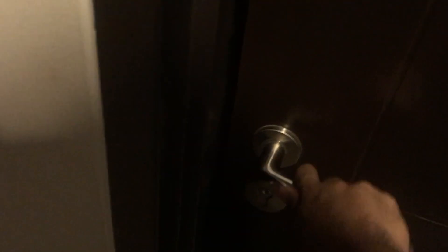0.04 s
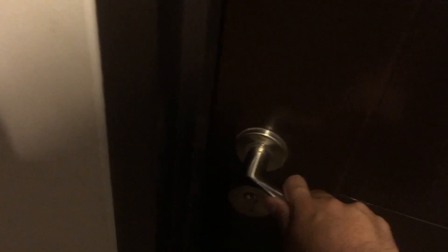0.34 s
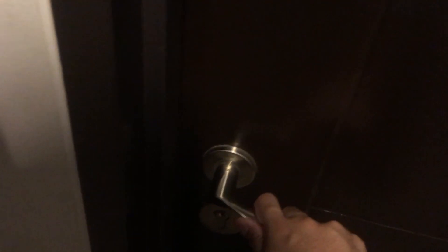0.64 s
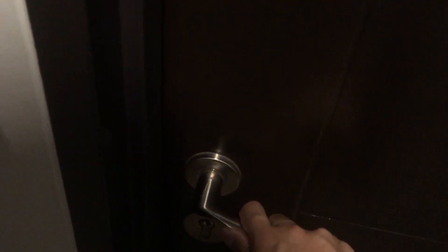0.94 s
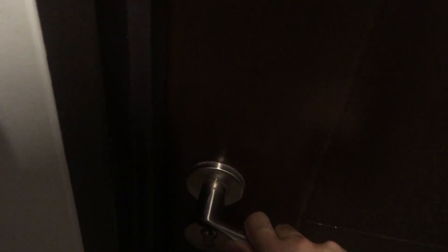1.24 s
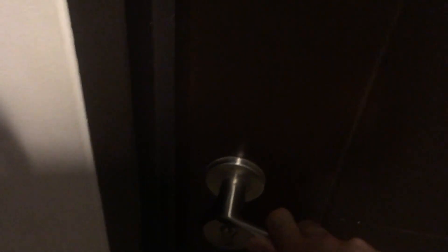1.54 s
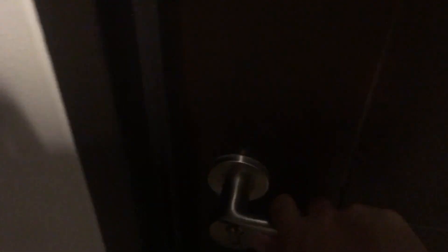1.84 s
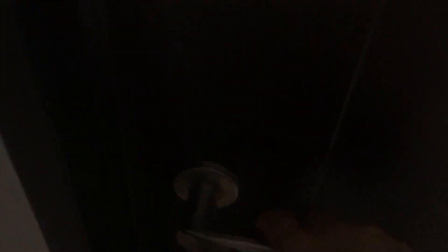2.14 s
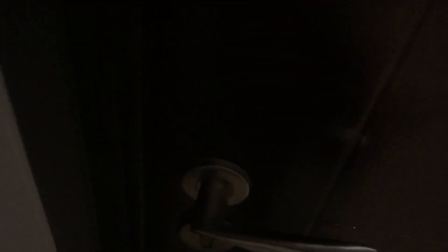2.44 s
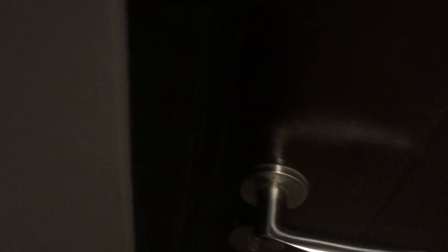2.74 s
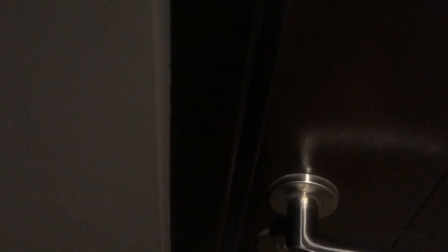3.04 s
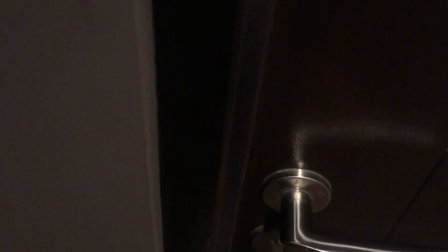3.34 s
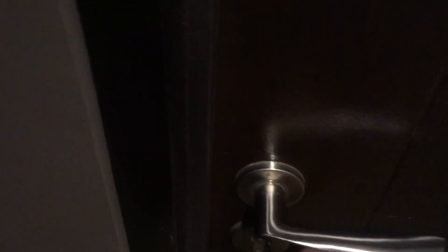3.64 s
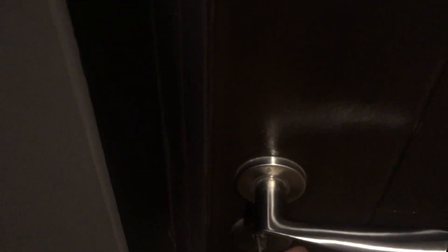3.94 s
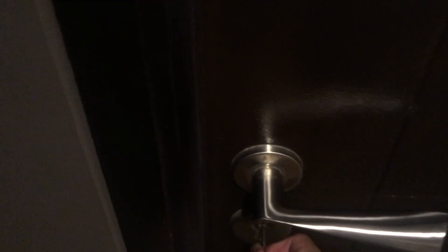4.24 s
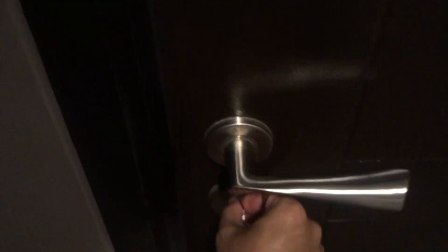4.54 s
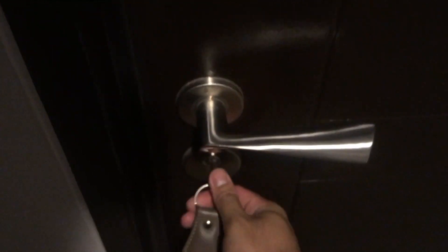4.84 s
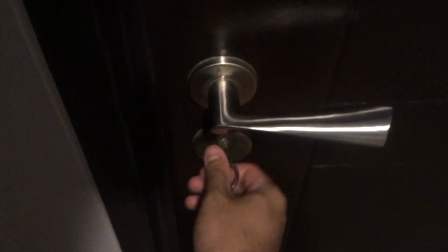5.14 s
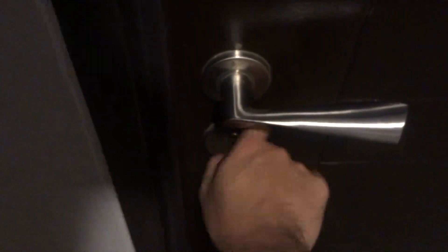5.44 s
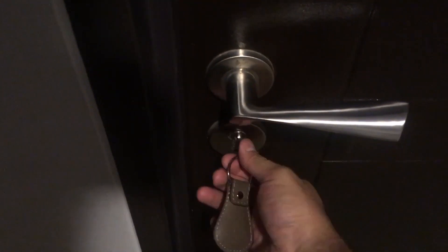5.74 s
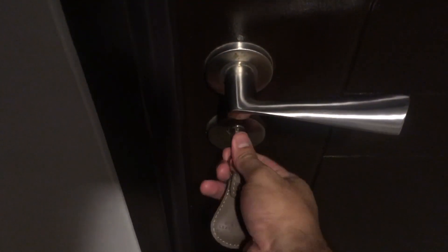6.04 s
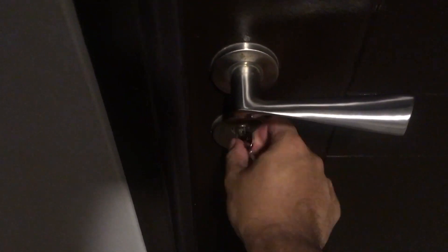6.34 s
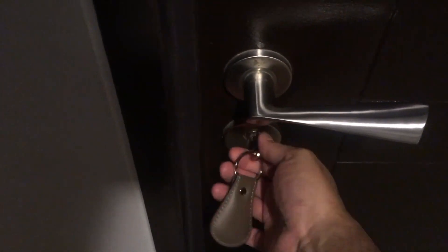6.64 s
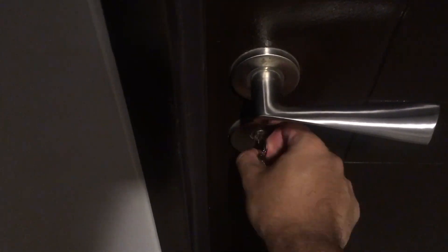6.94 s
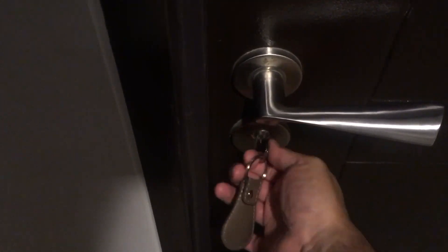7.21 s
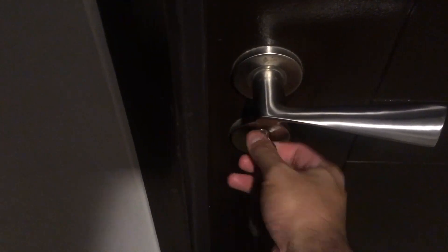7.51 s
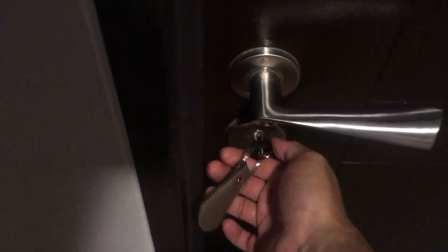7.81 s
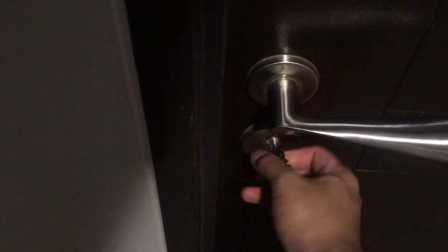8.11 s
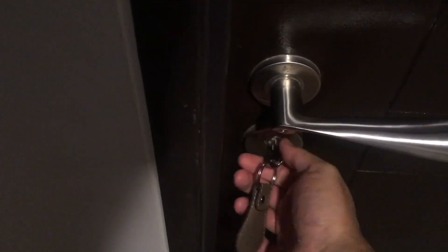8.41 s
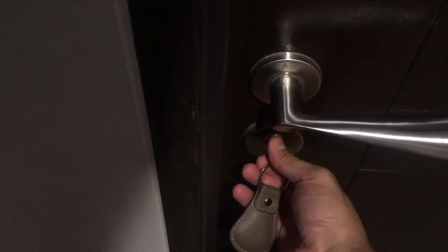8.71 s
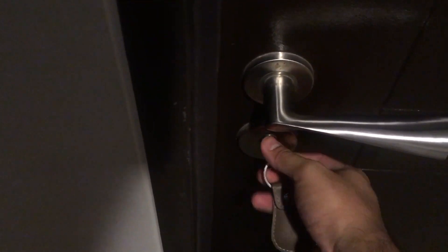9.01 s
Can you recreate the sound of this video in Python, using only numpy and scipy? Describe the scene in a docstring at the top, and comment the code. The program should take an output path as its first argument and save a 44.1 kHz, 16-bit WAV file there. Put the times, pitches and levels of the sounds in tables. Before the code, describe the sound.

A faint, low rush of building air runs throughout in a bare, slightly echoing hallway, with the microphone close to a door. At about 1.5 seconds the door is pushed shut, giving a series of dull thumps and latch rattles until about 2.6 seconds, while a hand slides on the lever handle with a soft hiss. Keys tinkle faintly between 2 and 3 seconds. Around 3.8 seconds a key scratches and clicks at the keyhole, then rides in over the pins with a quick gritty ripple at 4.5 seconds. The key turns three times, throwing the bolt with loud metal clacks at about 5.4, 6.3 and 7.6 seconds. Each jolts the door and leaves the lock ringing briefly. Thin, high key ring squeaks and sharp irregular clicks fill the gaps and continue until just after 9 seconds.

```python
"""A bare hallway, one microphone close to a door, the building's air rushing faintly behind.
First a hand slides on the lever handle and pushes the door shut: the leaf thumps, the latch rattles, and
metal tinkles faintly, like keys in a hand or pocket. Near 4 s a key scratches around the keyhole, then
rides in over the pins. From 5 s on it is turned three times; each turn squeaks the steel key ring and
throws the bolt with a loud clack that jolts the door and leaves the lock case ringing."""
import sys
import numpy as np
from scipy import signal
from scipy.fft import rfft, irfft, next_fast_len
from scipy.io import wavfile
from scipy.ndimage import uniform_filter1d

SR = 44100
rng = np.random.default_rng(int(sys.argv[2]) if len(sys.argv) > 2 else 0)


def materialize(psi):
    """Save the field psi as 16-bit PCM at rate SR to the path in sys.argv[1].

    A 1-D psi becomes a single channel; in a 2-D psi each row is a channel.
    """
    bounded = np.clip(np.atleast_2d(psi).T, -1, 1)
    quanta = np.round(bounded * 32767).astype(np.int16)
    wavfile.write(sys.argv[1], SR, quanta)


N = 404397
TIME = np.arange(N) / SR


def from_db(db):
    return 10 ** (np.asarray(db) / 20)


def rms_one(x):
    return x / np.sqrt(np.mean(x ** 2) + 1e-20)


def unit_energy(x):
    return x / np.sqrt(np.sum(x ** 2) + 1e-20)


def at_hz(points, hz):
    """Every column of a table, read on a log-frequency axis."""
    knots, *columns = np.transpose(points)
    return [np.interp(np.log(hz), np.log(knots), column) for column in columns]


def band(x, low_hz, high_hz, order=2):
    sos = signal.butter(order, [low_hz, min(high_hz, .45 * SR)], "band", fs=SR, output="sos")
    return signal.sosfilt(sos, x)


def decay(t60, size):
    return from_db(-60 * TIME[:size] / t60)


def resonate(x, hz, t60):
    """One mode with gain 1 at its peak."""
    r = np.exp(-np.log(1000) / (t60 * SR))
    feedback = [1, -2 * r * np.cos(2 * np.pi * hz / SR), r * r]
    return signal.lfilter(np.array([1, 0, -1]) * (1 - r * r) / 2, feedback, x + 1e-18)


def struck(modes, size):
    """The free ring of an object after one sharp blow."""
    return sum(from_db(db) * np.sin(2 * np.pi * hz * TIME[:size]) * decay(t60, size)
               for hz, db, t60 in modes)


def vary(modes, spread_db):
    """Each blow shares its energy differently among the modes."""
    return [(hz, db + rng.normal(0, spread_db), t60) for hz, db, t60 in modes]


def flicker(depth_db, size, smooth_samples):
    """A gain that wanders at random."""
    return from_db(depth_db * rms_one(uniform_filter1d(rng.standard_normal(size), smooth_samples)))


def add(track, t, sound):
    """Lay a sound into a track, starting at t seconds."""
    start = int(t * SR)
    track[start:start + len(sound)] += sound[:N - start]


def noise(colour):
    """Steady noise of a given spectrum, rms 1."""
    size = next_fast_len(N)
    level_db, = at_hz(colour, np.fft.rfftfreq(size, 1 / SR) + 1)
    return rms_one(irfft(rfft(rng.standard_normal(size)) * from_db(level_db), size)[:N])


def handling(level_db, count, from_s=4.8, to_s=8.9, spread_db=4):
    """Faint touches scattered over the time the fingers work the key: t/s, level/dB."""
    slot = (to_s - from_s) / count
    return [(from_s + slot * (k + when), level_db - spread_db * (2 * softness - 1))
            for k, (when, softness) in enumerate(rng.random((count, 2)))]


# spectra of the air in the hallway and of the distant rush: f/Hz, relative density/dB
AIR_COLOUR = [(15, -36), (25, -23), (53, -4.5), (92, -1.5), (123, -1.5), (149, -2.5), (223, -3), (263, -8),
              (354, -14.5), (503, -18.5), (1020, -22.5), (6050, -41), (7710, -47), (14800, -36),
              (16000, -54)]
RUSH_COLOUR = [(120, -25), (250, 12.5), (500, 7.5), (1100, 3.5), (2000, -6), (4000, -22), (8000, -25.5)]
# the rush as it reaches the microphone, with the door's swish near 0.76 s: t/s, level/dB
RUSH_LEVELS = [(0, -52), (.5, -71), (.72, -62), (.76, -51), (1.5, -49.5), (3.3, -49), (4.2, -47.5),
               (7, -45.5), (9.17, -47)]


def building_air(air_db=-42.5):
    """Room tone: steady low air all around, and a rush that dips early on, then swells near 0.76 s as the
    swinging door stirs the air."""
    rush_gain = from_db(np.interp(TIME, *np.transpose(RUSH_LEVELS)))
    return from_db(air_db) * noise(AIR_COLOUR) + rush_gain * noise(RUSH_COLOUR)


# the hallway from beside the door: f/Hz, early level/dB, early t60/s, tail level/dB, tail t60/s
HALL_RESPONSE = [(158, 1.5, 0.35, -12, 1.1), (500, 0, 0.28, -11.5, 0.88), (1230, -8, 0.27, -10.5, 1.04),
                 (2820, -13.5, 0.24, -16.5, 1.45), (6100, -11.5, 0.32, -19, 1.26),
                 (9670, -12.5, 0.2, -21.5, 0.89), (14300, -14, 0.26, -25, 0.85)]


def hallway(x, first_echo_s=0.00068):
    """Near walls answer quickly; further down the hall each band builds up and fades as a wash."""
    size, edges_hz = int(.5 * SR), np.geomspace(100, 17000, 17)
    echo, wash = np.zeros(size), np.zeros(N)
    onset = np.clip(TIME[:size] / first_echo_s - .5, 0, 1)
    white = rng.standard_normal((2, N))   # neighbouring bands get unrelated noise
    for k, (low, high) in enumerate(zip(edges_hz, edges_hz[1:])):
        early_db, early_t60, tail_db, tail_t60 = at_hz(HALL_RESPONSE, np.sqrt(low * high))
        walls = band(rng.standard_normal(size), low, high, order=3) * decay(early_t60, size) * onset
        echo += from_db(early_db) * np.sqrt(2 * (high - low) / SR) * unit_energy(walls)
        kept = np.exp(-2 * np.log(1000) / (tail_t60 * SR))
        energy = signal.lfilter([1 - kept], [1, -kept], band(x, low, high, order=3) ** 2)
        wash += from_db(tail_db) * np.sqrt(energy) * rms_one(band(white[k % 2], low, high, order=3))
    return x + signal.fftconvolve(x, echo)[:N] + wash


# sleeve and hand at the handle: peak t/s, relative level/dB, rise/(dB/s), fall/(dB/s)
RUBS = [(1.8, -55, 84, 50), (2.15, -60, 23, 50), (2.55, -64, 19, 51), (3.2, -69, 3, 50)]
# their hiss: f/Hz, relative density/dB
RUB_COLOUR = [(800, -32), (1500, 12), (3000, 5), (6000, -2), (10000, 1.5), (15000, -0.5)]


def hand_rub(gain_db=9):
    """Sliding cloth and skin make a smooth hiss that swells and fades."""
    swells = [from_db(db - np.maximum(rise * (t - TIME), fall * (TIME - t)))
              for t, db, rise, fall in RUBS]
    return from_db(gain_db) * np.max(swells, axis=0) * noise(RUB_COLOUR)


# the key's tip around the keyhole, then its blade in the keyway: t/s, length/s, level/dB
SCRAPES = [(3.8, .03, -45.5), (3.9, 0.026, -45.5), (4.286, 0.023, -45), (4.38, .02, -45.5),
           (4.479, 0.074, -37.5), (4.882, .015, -53), (5.172, .03, -47.5), (5.727, .07, -51),
           (6.868, 0.074, -51.5)]
# their grit: f/Hz, relative density/dB
SCRAPE_COLOUR = [(300, -6), (650, -19), (1050, 19.5), (2000, 5), (3000, 3), (4500, -12), (6500, -5),
                 (10000, -11), (14000, -21)]


def key_scrape(attack_s=0.0089, release_s=0.015, rumble_db=0.5, rumble_lag_s=.02):
    """Each gritty stroke of the key builds up, holds and lets go; the door panel rumbles just after."""
    force = np.zeros(N)
    for t, length, db in SCRAPES:
        ramps = np.minimum((TIME - t) / attack_s, (t + length - TIME) / release_s)
        force += from_db(db) * np.exp(np.clip(ramps, -20, 0))
    burrs = flicker(-5, N, smooth_samples=130)
    panel = rms_one(band(rng.standard_normal(N), 195, 327))
    rumble = np.interp(TIME - rumble_lag_s, TIME, force) * panel
    return force * rms_one(burrs * noise(SCRAPE_COLOUR)) + from_db(rumble_db) * rumble


# faint tinkles near the microphone: t/s, level/dB
TINKLES = [(2.25, -48), (2.43, -44), (2.56, -48), (2.625, -56), (2.865, -54.5), (3.145, -49)]
# the small metal that tinkles: f/Hz, relative level/dB, t60/s
TINKLE_MODES = [(6300, -2, 0.058), (7760, -4, 0.066), (12750, 6, .06)]


def key_tinkles():
    """Faint, high metal tinkles, like keys jingling in a hand or pocket."""
    out = np.zeros(N)
    for t, db in TINKLES:
        add(out, t, from_db(db) * struck(vary(TINKLE_MODES, spread_db=3), SR // 5))
    return out


# loose parts in the door's metalwork: t/s, f/Hz, peak level/dB
CLINKS = [(1.904, 2340, -34), (3.771, 1820, -26.5), (3.955, 915, -23), (6.171, 560, -31),
          (6.704, 850, -27.5), (8.062, 1440, -23.5), (8.634, 888, -23.5), (9.096, 2870, -22.5)]


def loose_parts(t60=0.043):
    """A contact leaves one loose part ringing on a single note."""
    out = np.zeros(N)
    for t, hz, db in CLINKS:
        add(out, t, struck([(hz, db, t60)], SR // 5))
    return out


# steel key and ring: f/Hz, struck level/dB, rubbed level/dB, t60/s
RING_MODES = [(7660, -23, -27, 0.09), (8260, -14, -31, 0.11), (9420, 7, -7, 0.0067),
              (10900, -9, -26, 0.025), (11950, -12, 15.5, 0.0325), (13000, -14.5, -9, 0.047),
              (13800, 1, 15, 0.017), (14440, -2, 13, 0.018), (12500, -12, -5, .015),
              (14000, -16, -10, 0.017)]
# the ring sticks and slips in the bow of the key: t/s, length/s, level/dB
SLIPS = [(5.179, 0.014, -33), (5.199, .053, -30.5), (5.254, .013, -23.5), (5.267, 0.015, -28),
         (5.316, 0.011, -37), (6.216, .014, -42), (6.365, .034, -42), (6.434, .017, -38),
         (6.611, 0.012, -41), (6.762, 0.0037, -29), (7.013, 0.0065, -35.5), (7.282, 0.0089, -42),
         (7.361, 0.0055, -39), (7.38, .017, -41), (7.608, 0.025, -34), (7.68, .02, -43),
         (8.173, 0.016, -31), (8.247, 0.025, -40), (8.555, 0.0092, -35.5), (8.611, .012, -26.5),
         (9.121, .038, -44)]
# the ring swings free and is struck: t/s, level/dB
PINGS = [(4.092, -25.5), (4.288, -30.5), (8.048, -48)]


def key_ring(slips_per_s=2500, grit_db=-12, faint_slip_s=0.013, held_t60=0.017, ping_t60=.07):
    """Rapid uneven slips make the ring squeak, damped by the fingers; a free blow lets it ping."""
    out, size = np.zeros(N), SR // 4
    age = TIME[:size]
    faint = [(t, faint_slip_s, db) for t, db in handling(level_db=-50, count=12)]
    for t, length, db in SLIPS + faint:
        pressure = np.clip(np.minimum(age, length - age) / 0.0011, 0, 1)
        friction = rng.standard_normal(size) * pressure
        slipping = rng.random(size) < slips_per_s / SR
        friction *= slipping + from_db(grit_db)
        seat = rng.normal(1, 0.0076)   # the ring seats a little differently each time
        squeak = np.zeros(size)
        for hz, _, rubbed_db, t60 in RING_MODES:
            # the contact point wanders and favours one mode after another
            drive = friction * flicker(2.5, size, smooth_samples=400)
            seated_hz = hz * rng.normal(1, 0.01) * seat
            squeak += from_db(rubbed_db) * resonate(drive, seated_hz, min(t60, held_t60))
        to_rms = np.sqrt(length * SR)
        squeak = np.tanh(unit_energy(squeak) * to_rms / 2)   # friction limits its own swing
        add(out, t, from_db(db) * to_rms * unit_energy(band(squeak, 9400, 14700, order=8)))
    free_modes = [(hz, struck_db, min(t60, ping_t60)) for hz, struck_db, _, t60 in RING_MODES]
    for t, db in PINGS:
        ping = struck(vary(free_modes, spread_db=2.4), size)
        add(out, t, from_db(db) * band(ping, 7800, 13500))
    return out


# blows that shake the whole door: t/s, level/dB, contact time/s
THUMPS = [(1.456, -19, .011), (1.635, -19, 0.012), (2.202, -20, 0.0022), (2.33, -24.5, 0.0026),
          (2.424, -22, 0.007), (2.552, -27, 0.0051), (2.769, -37.5, 0.0046), (4.421, -32.5, 0.00092),
          (4.544, -32.5, 0.0011), (5.438, -37.5, .001)]
# the door leaf: f/Hz, relative level/dB, t60/s
LEAF_MODES = [(52, -16, .16), (73.24, 2, 0.75), (87.3, 7, 0.16), (127.3, 3.5, 0.1), (163, -2, 0.19),
              (220.7, -6, 0.31), (265, -3, 0.14)]


def door_leaf(jolts, gain_db=-3):
    """Soft blows and sharp jolts swing the leaf's low modes."""
    pushes = np.zeros(N)
    for t, db, contact_s in THUMPS + jolts:
        push = np.hanning(max(int(contact_s * SR), 8))
        add(pushes, t, from_db(db) * push / push.sum())
    swing = signal.fftconvolve(pushes, struck(LEAF_MODES, SR))[:N]
    return from_db(gain_db) * band(swing, 55, 350)   # the leaf radiates poorly in the deepest bass


def door_panel(contacts, gain_db=-6, limit_db=-30, t60=0.16):
    """The low band of each metal contact shakes the stiff panel, up to a limit."""
    out, size = np.zeros(N), SR // 4
    for t, low_db, *_ in contacts:
        shake = band(rng.standard_normal(size) * decay(t60, size), 137, 324, order=3)
        add(out, t, from_db(min(low_db, limit_db) + gain_db) * np.sqrt(0.013 * SR) * unit_energy(shake))
    return out


# share of a contact's brightness that reaches each band: low, middle, high, top
BRIGHTNESS_SHARE = [0.029, 0.026, 0.026, 1]


def contact(t, db, colour, brightness_db=0):
    """One touch of metal on metal: t/s, then its level in four bands, low/dB to top/dB."""
    return (t, *(db + np.array(colour) + brightness_db * np.array(BRIGHTNESS_SHARE)))


# knocks at the door's edge and handle: t/s, level/dB, brightness/dB
LATCH_KNOCKS = [(0.08, -48.5, -10), (0.138, -45, -13), (1.451, -42, 8.5), (1.6484, -46, 6),
                (1.681, -40.5, -33), (1.902, -33.5, -5), (2.1925, -27.5, -26), (2.1993, -30.5, -4),
                (2.2434, -41, -15), (2.3247, -28.5, -20), (2.419, -32, -18), (2.483, -39.5, -29),
                (2.5608, -56, 14), (3.361, -53, 12)]
# their colour: low/dB, middle/dB, high/dB, top/dB
KNOCK_COLOUR = [1, 0.47, -4.2, -0.62]


def latch_knocks():
    """Latch and handle knock as the door closes."""
    return [contact(t, db, KNOCK_COLOUR, brightness) for t, db, brightness in LATCH_KNOCKS]


# ticks at the keyhole: t/s, level/dB, transfer to the lock body/dB
KEY_TICKS = [(4.244, -42, -9), (4.2879, -33, -22), (4.676, -43, -14), (5.053, -28, -13),
             (5.0702, -37.5, -6), (5.7428, -31.5, -12), (5.792, -39, -7), (6.2266, -37, -20),
             (6.508, -43.5, -4.5), (6.702, -32, -17), (6.767, -24, -15), (7.2325, -43, -7),
             (7.2543, -43, -7), (7.2845, -31, -15), (7.2921, -30.5, -9.5), (7.9276, -38, -7),
             (7.938, -29, -14), (7.9916, -36, -9), (8.0474, -26, -14.5), (8.328, -46.5, -4.5),
             (8.455, -42.5, -5), (8.512, -35.5, -8), (8.5663, -39.5, -3.5), (9.15, -33.5, -9)]
# their colour: low/dB, middle/dB, high/dB, top/dB
TICK_COLOUR = [0, 0, -1, 0]
# 1 where the lock body carries the band: low, middle, high, top
BODY_BANDS = [1, 1, 1, 0]


def key_ticks(enter_s=4.4456, home_s=4.534, pin_db=-32.5, pin_body_db=-13.5, faint_body_db=-5):
    """The key's edge ticks against the keyhole, and its blade speeds up as it rides over eight pins."""
    pins = [(enter_s + (home_s - enter_s) * depth ** .7, pin_db, pin_body_db)
            for depth in np.linspace(0, 1, 8)]
    faint = [(t, db, faint_body_db) for t, db in handling(level_db=-50, count=12)]
    return [contact(t, db, TICK_COLOUR + body_db * np.array(BODY_BANDS))
            for t, db, body_db in KEY_TICKS + pins + faint]


# clicks from inside the lock: t/s, level/dB, brightness/dB
LOCK_CLICKS = [(3.771, -43.5, 0), (3.951, -29, -4), (3.9666, -32, -7), (4.4185, -28.5, -11),
               (4.537, -27.5, -10), (4.542, -34, 1), (4.553, -38, 2), (4.964, -46, -7), (5.08, -34.5, -3),
               (5.8757, -38.5, -4), (5.9096, -42.5, -9), (6.0164, -36.5, -15), (6.1698, -35, -14),
               (6.218, -40.5, -8), (6.62, -37.5, -11), (6.704, -37, -10), (6.7771, -32.5, -1),
               (7.408, -33.5, -18), (7.4165, -30, -7), (7.43, -39, 0), (7.4563, -30, -5), (7.474, -37, -3),
               (7.5258, -29, -3), (7.5524, -37, -33), (7.566, -32, -38), (8.0601, -28, -1.5),
               (8.4983, -45, -6), (8.633, -24, -5), (8.64, -30.5, -7), (8.691, -33, -27),
               (8.7167, -32.5, -7), (9.096, -29.5, -24), (9.109, -36.5, -1)]
# their colour: low/dB, middle/dB, high/dB, top/dB
CLICK_COLOUR = [-4.5, 0, -5.5, -0.5]


def lock_clicks(faint_brightness_db=-19):
    """The key bears on the cylinder and the cam clicks in the lock case."""
    faint = [(t, db, faint_brightness_db) for t, db in handling(level_db=-47.5, count=10)]
    return [contact(t, db, CLICK_COLOUR, brightness) for t, db, brightness in LOCK_CLICKS + faint]


# the bolt at its stop: t/s, level/dB, travel time/s, release level/dB, brightness/dB, door jolt/dB
BOLT_THROWS = [(5.39, -19.5, 0.0024, -16.5, 8, -32.5), (6.2777, -18, 0.0099, -17, -5, -42),
               (7.5945, -14, .0073, -14.5, -4, -36)]
# colours of the three stages of a throw: low/dB, middle/dB, high/dB, top/dB
RELEASE_COLOUR = [-7, -6, -3, 0]
STOP_COLOUR = [-5.5, 1, 1.5, -2]
REBOUND_COLOUR = [-5, -3.5, -31, -12]


def bolt_throws(rebound_s=.004, jolt_contact_s=0.00037):
    """The bolt snaps free, hits its stop and rebounds once: three contacts, and one jolt to the leaf."""
    clacks, jolts = [], []
    for t, db, travel_s, release_db, brightness, jolt_db in BOLT_THROWS:
        clacks += [contact(t - travel_s, release_db, RELEASE_COLOUR),
                   contact(t, db, STOP_COLOUR, brightness),
                   contact(t + rebound_s, db, REBOUND_COLOUR, brightness)]
        jolts.append((t + rebound_s, jolt_db, jolt_contact_s))
    return clacks, jolts


# the long-ringing modes of the lock case: f/Hz, relative level/dB, t60/s
CASE_MODES = [(570, -3, 0.46), (1300, -4, .4), (1515, -3, .45), (1666, -5, .45), (1889, -2, .45),
              (2105, -2, 0.63), (2638, -12, .45), (2793, -1, 0.49), (3000, -3, 0.49), (3360, -6, 0.36),
              (5692, -7, .5), (7037, -10, .45), (8280, -11, .5), (9500, -7, .35)]


def case_ring(against_throw_db=-26):
    """The steel of the lock case sings on faintly after each throw."""
    out = np.zeros(N)
    for t, db, *_ in BOLT_THROWS:
        add(out, t, from_db(db + against_throw_db) * struck(vary(CASE_MODES, spread_db=2), SR))
    return out


# latch and handle plate, close to the microphone: f/Hz, relative level/dB, t60/s
LATCH_MODES = [(574, 2.5, 0.031), (970, 5.5, 0.031), (1200, 1, 0.02), (1740, 2, 0.012), (2290, 11.5, 0.02),
               (2840, 10.5, 0.014), (3480, 5.5, 0.01), (4500, 4.5, 0.027), (5020, 7, 0.015),
               (5520, 7, 0.0018), (6880, 8.5, 0.003), (8900, 2, 0.0074), (12800, -19, 0.011),
               (14500, -17, 0.01)]
# key, cylinder and lock case, just as close: f/Hz, relative level/dB, t60/s
LOCK_MODES = [(567, 0.5, 0.065), (995, 4, 0.018), (1290, -5, 0.0026), (1626, -3, 0.0052), (1928, 3, 0.052),
              (2260, -4, .014), (2770, 1.5, 0.028), (2910, 3, 0.02), (3388, 0.5, 0.0081), (4500, -24, 0.03),
              (5655, 8.5, 0.0058), (6030, 4, 0.0016), (6590, 7, 0.01), (7100, -0.5, 0.017),
              (8580, 1, 0.0071), (9190, -5.5, 0.028), (9510, 5.5, 0.021), (11240, -11, .012),
              (12200, 5, 0.01), (12600, -12, 0.011), (14230, 0, 0.0081), (12600, -10, 0.012),
              (13500, -4, 0.0035), (15000, -8, 0.011)]
# edges of a contact's low, middle, high and top bands: f/Hz
BAND_EDGES_HZ = [450, 1500, 4000, 10500, 16500]


def metalwork(contacts, modes, chatter_t60=0.021, crack_db=-9, wood_db=-10, wood_t60=0.054):
    """Each contact is a brief chatter that rings the metal; the wood around it answers for longer."""
    out, size = np.zeros(N), SR // 10
    to_rms = np.sqrt(.005 * SR)   # band levels are the rms of a 5 ms blow
    for t, *levels_db in contacts:
        # light, bright touches are over sooner than heavy ones
        brightness_db = np.clip(levels_db[-1] - levels_db[1], -8, 12)
        envelope = decay(chatter_t60 * from_db(-0.3 * brightness_db), size)
        chatter, crack = rng.standard_normal((2, size)) * envelope
        excited = vary(modes, spread_db=2.5)
        grip = rng.normal(1, .015, len(modes))   # the hand's load shifts each mode a little
        metal = from_db(crack_db) * crack
        for k, (hz, db, t60) in enumerate(excited):
            metal += (-1) ** k * from_db(db) * resonate(chatter, hz * grip[k], t60)
        wood = band(rng.standard_normal(size) * decay(wood_t60, size), 770, 3280)
        blow = unit_energy(metal) + from_db(wood_db) * unit_energy(wood)
        for low, high, db in zip(BAND_EDGES_HZ, BAND_EDGES_HZ[1:], levels_db):
            add(out, t, to_rms * from_db(db) * unit_energy(band(blow, low, high, order=4)))
    return out


def scene():
    """Mono: latch, lock, key and door up close, the hallway around them, the building's air behind."""
    clacks, jolts = bolt_throws()
    on_latch = latch_knocks()
    on_lock = lock_clicks() + key_ticks() + clacks
    near = metalwork(on_latch, LATCH_MODES) + metalwork(on_lock, LOCK_MODES)
    near += key_ring() + loose_parts() + key_tinkles() + case_ring()
    near += door_leaf(jolts) + door_panel(on_latch + on_lock)
    near += hand_rub() + key_scrape()
    return (building_air() + hallway(near))[None]


def record(dry, cutoff_hz=15900):
    """After the microphone the loudest peaks are rounded and the top is cut."""
    rounded = 1.253 * np.tanh(dry / 1.337)
    return signal.sosfilt(signal.ellip(10, .2, 110, cutoff_hz, fs=SR, output="sos"), rounded)


dry = scene()
out = record(dry)
materialize(out)
```